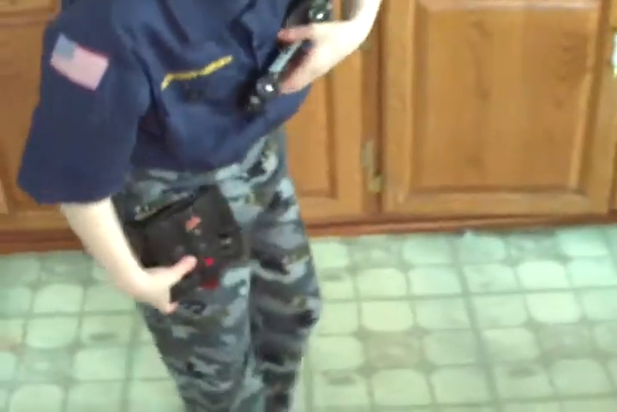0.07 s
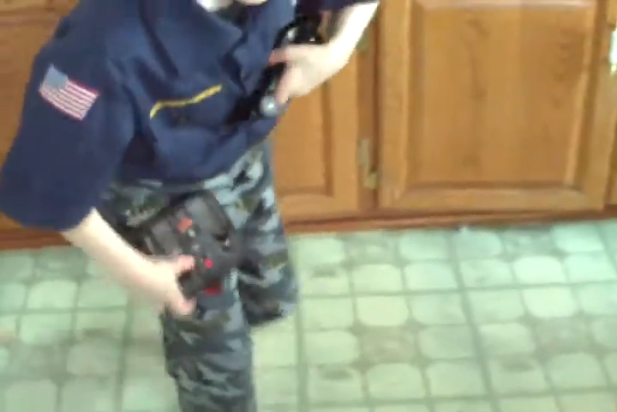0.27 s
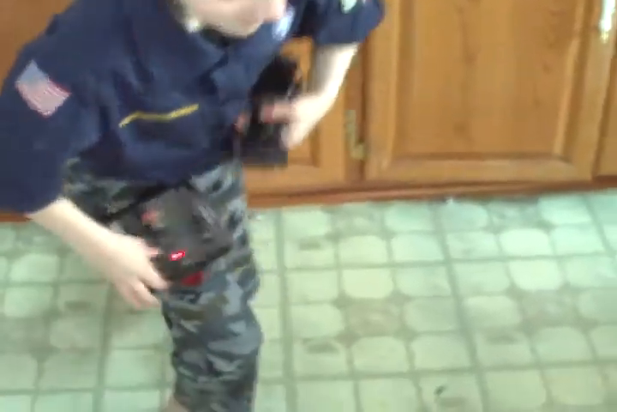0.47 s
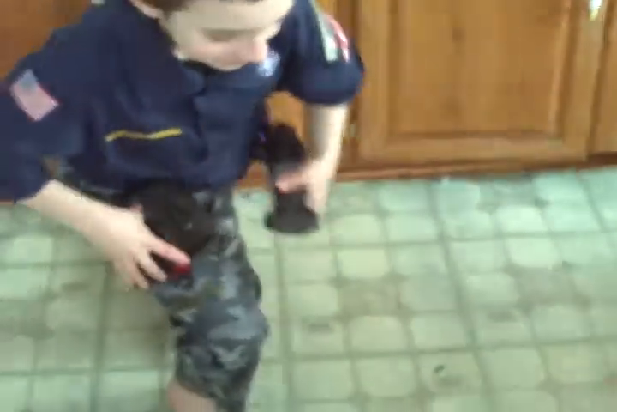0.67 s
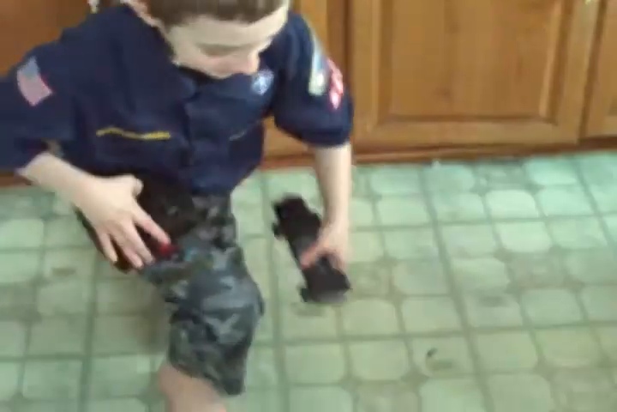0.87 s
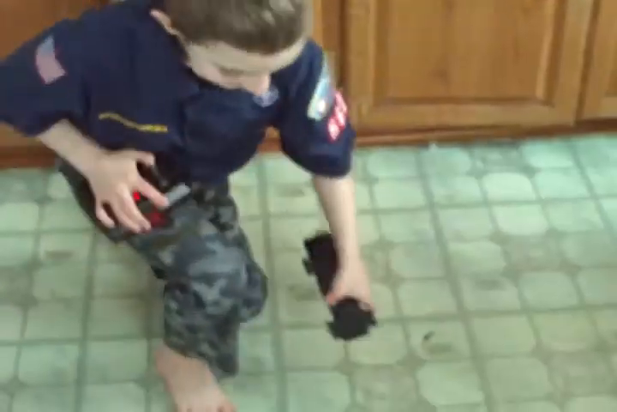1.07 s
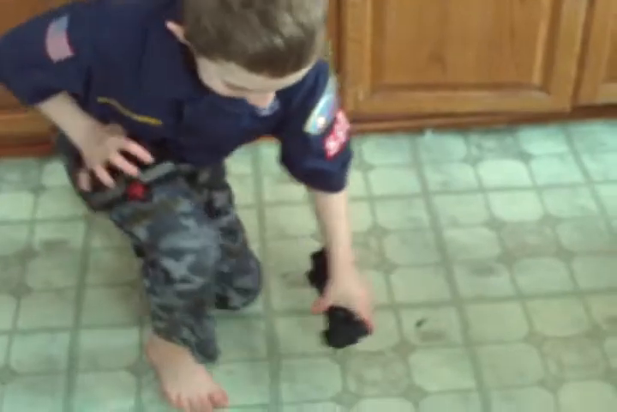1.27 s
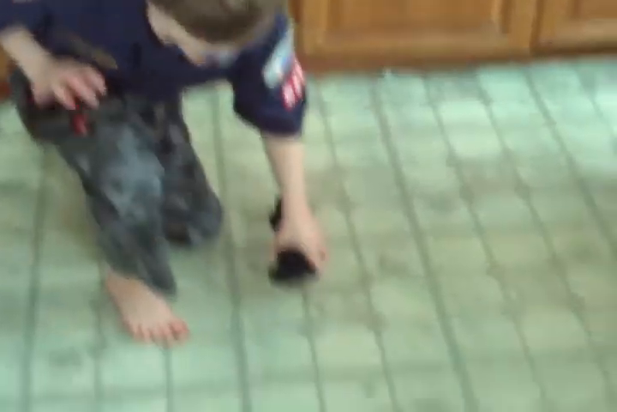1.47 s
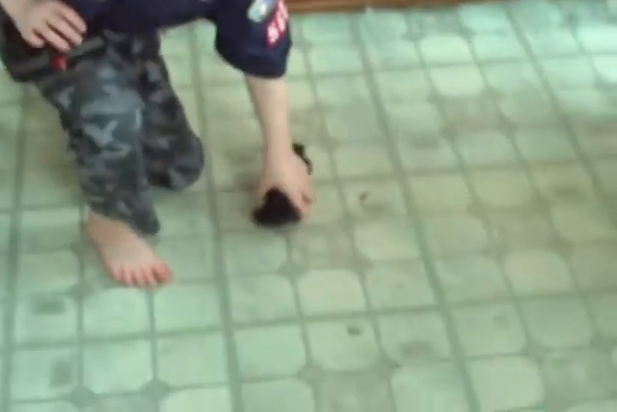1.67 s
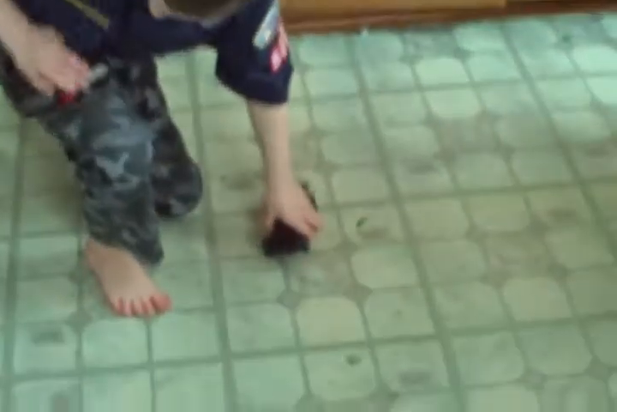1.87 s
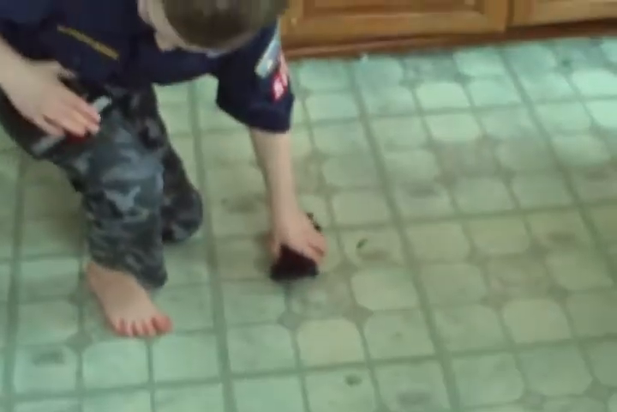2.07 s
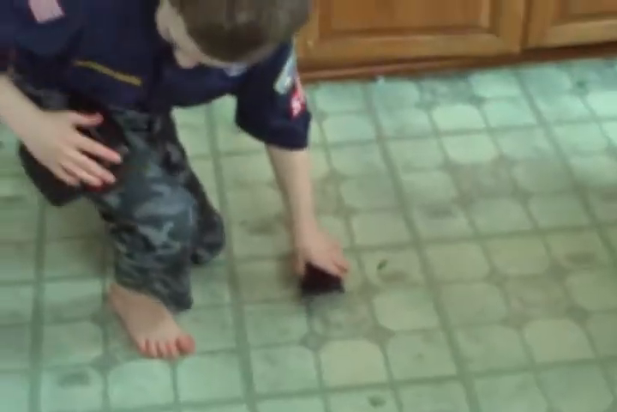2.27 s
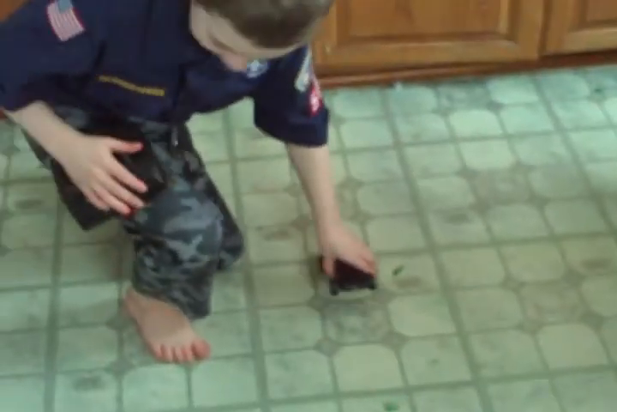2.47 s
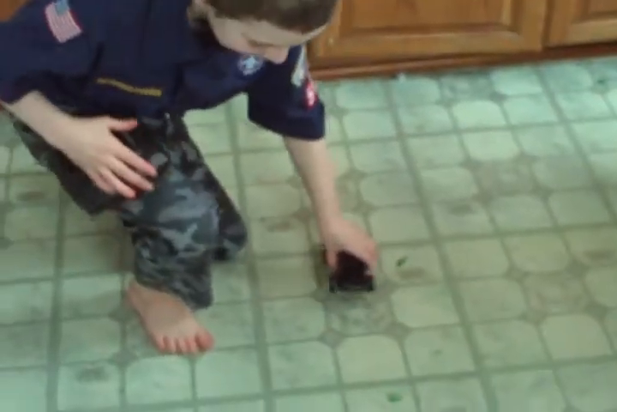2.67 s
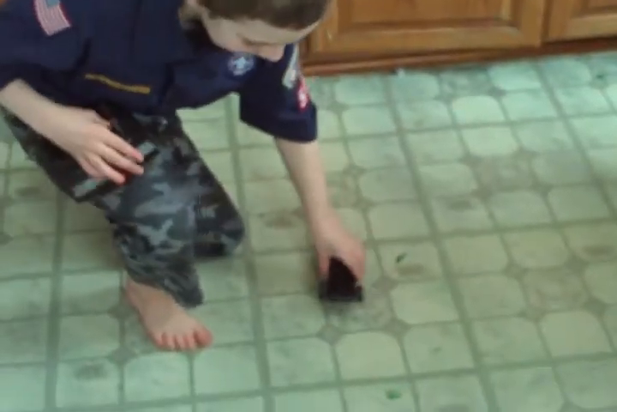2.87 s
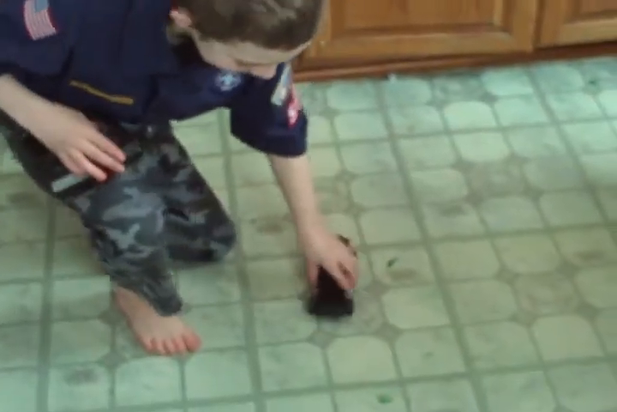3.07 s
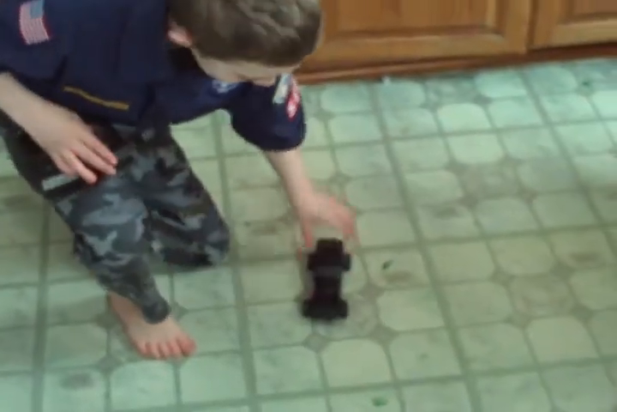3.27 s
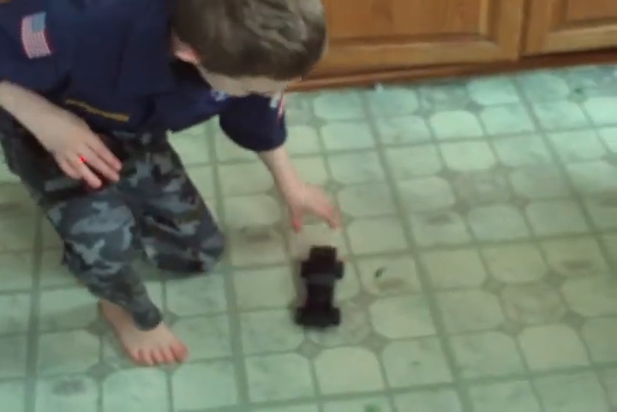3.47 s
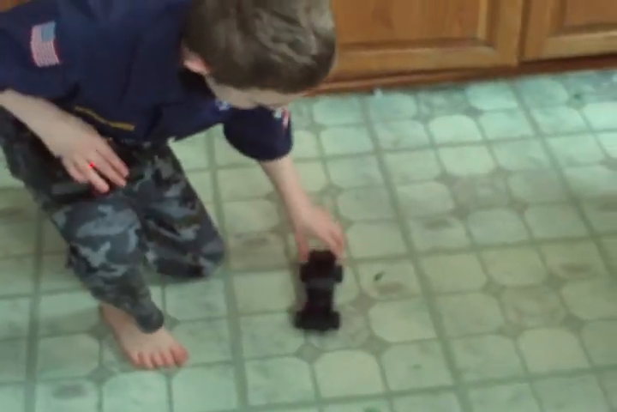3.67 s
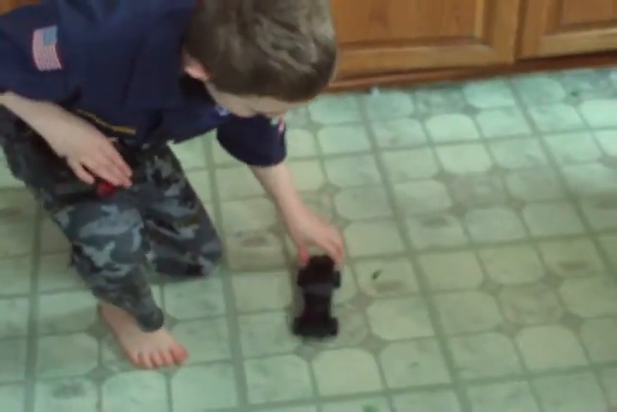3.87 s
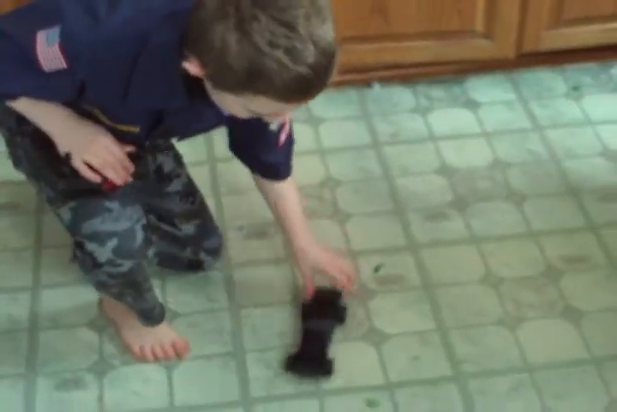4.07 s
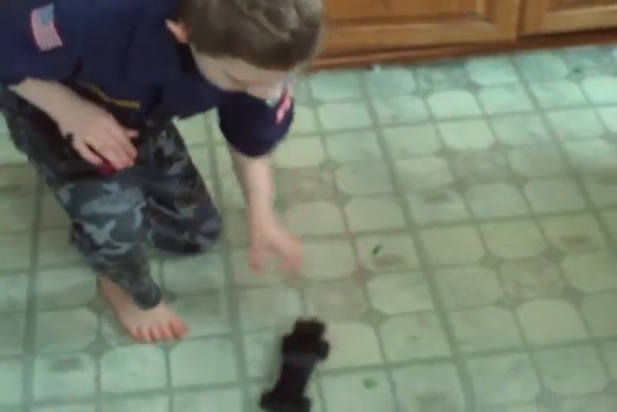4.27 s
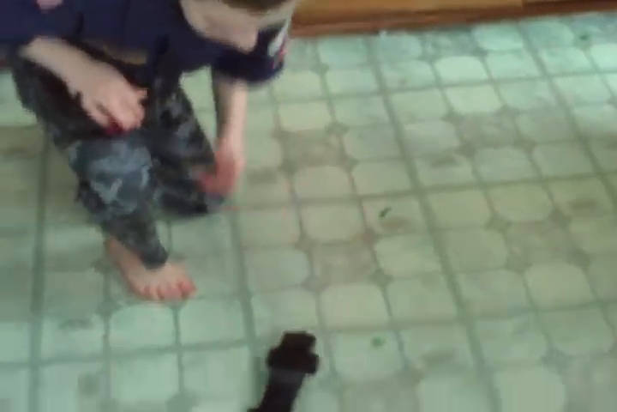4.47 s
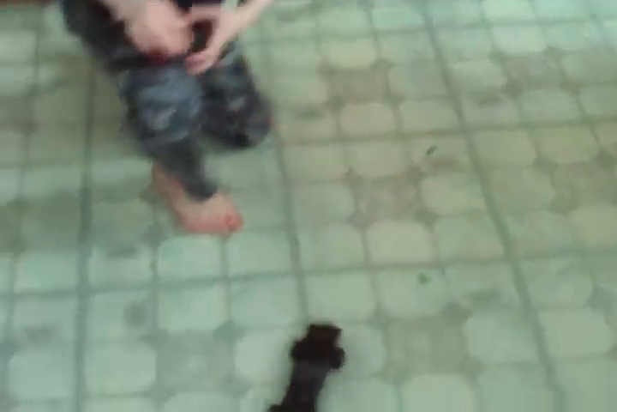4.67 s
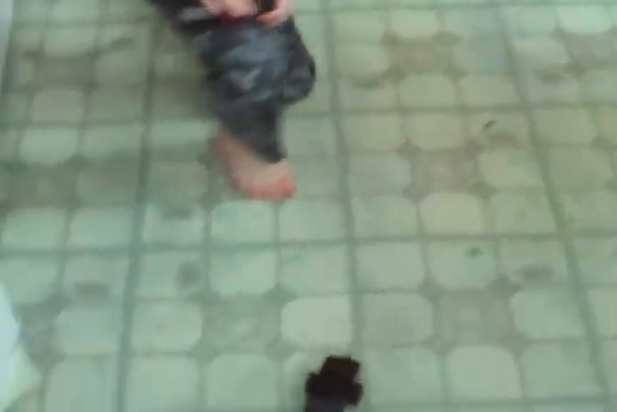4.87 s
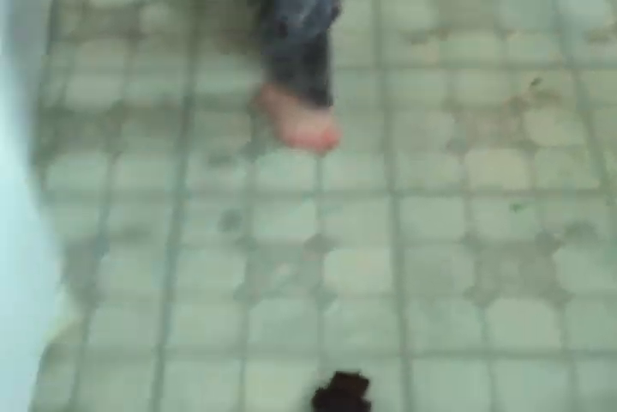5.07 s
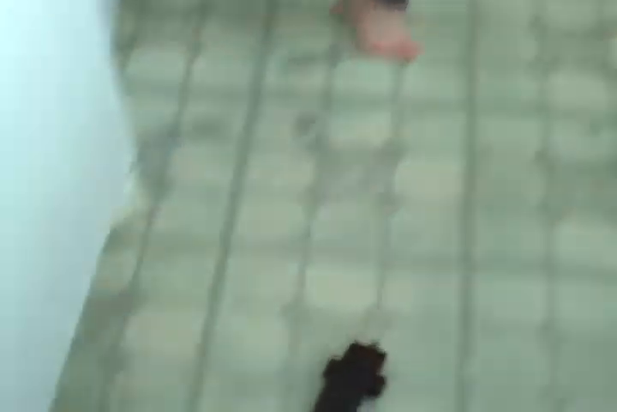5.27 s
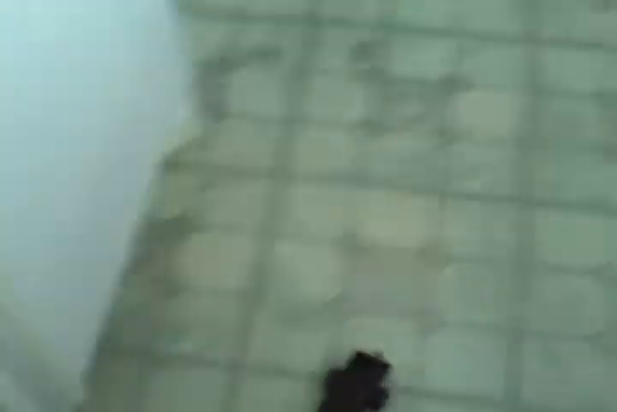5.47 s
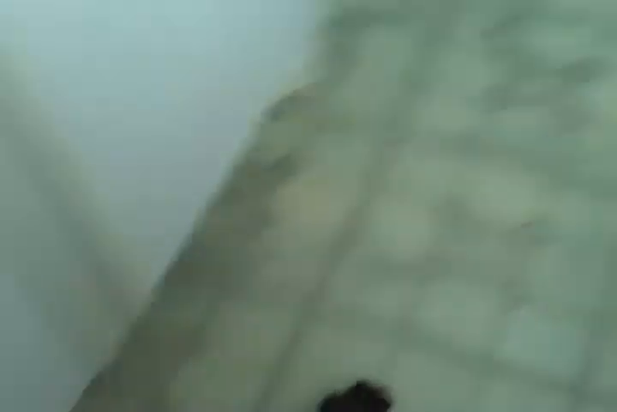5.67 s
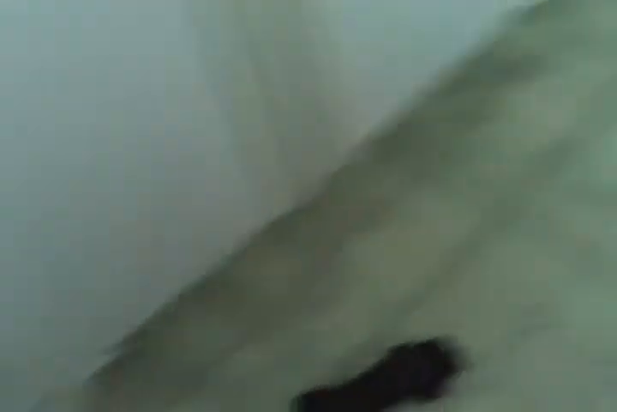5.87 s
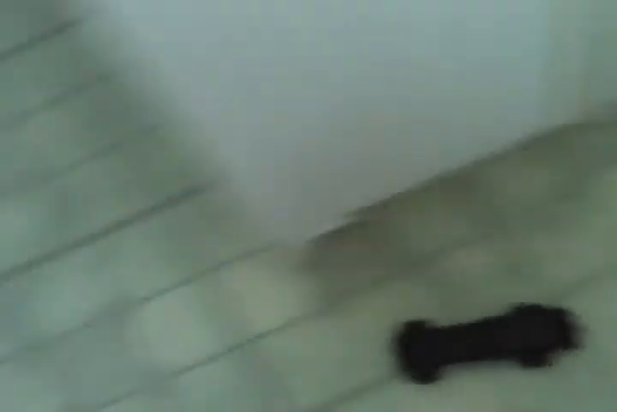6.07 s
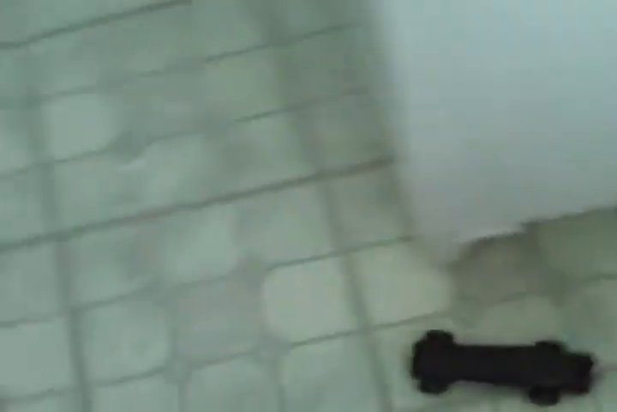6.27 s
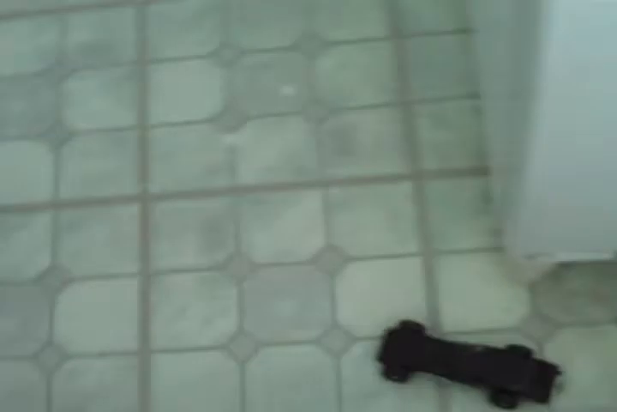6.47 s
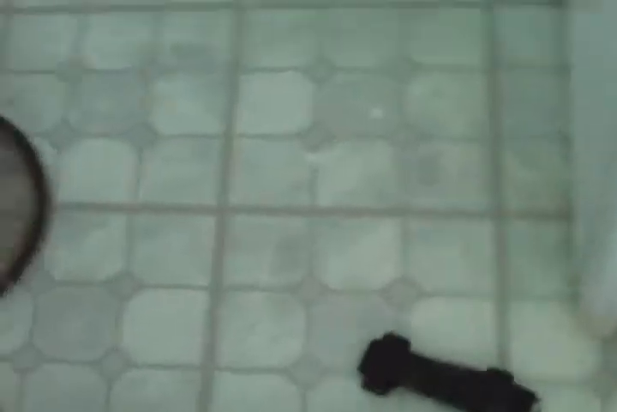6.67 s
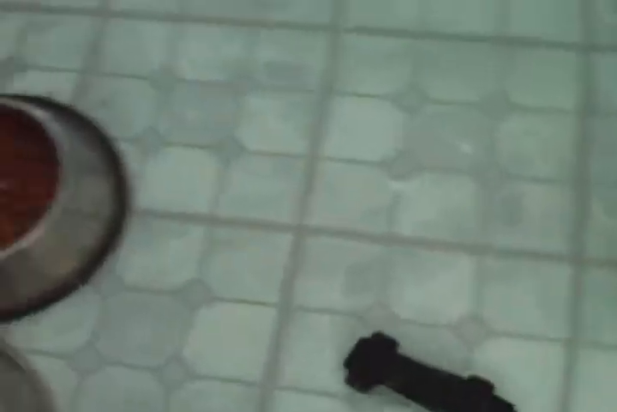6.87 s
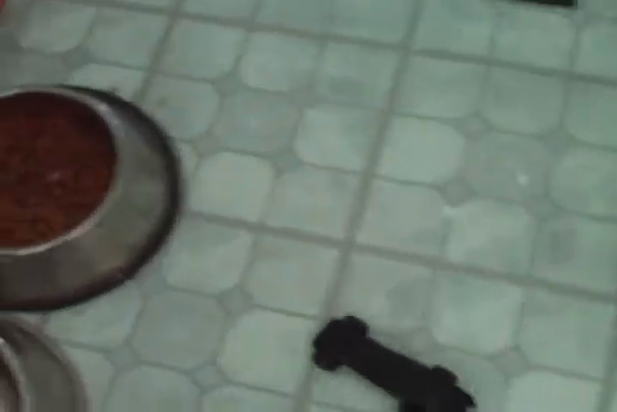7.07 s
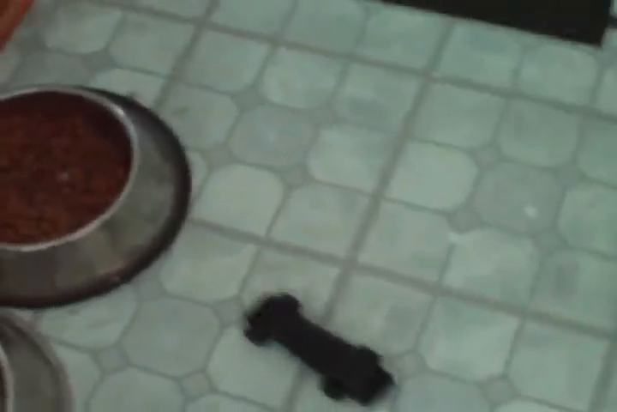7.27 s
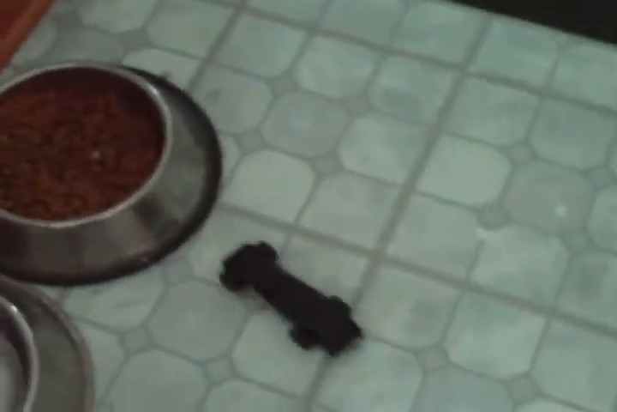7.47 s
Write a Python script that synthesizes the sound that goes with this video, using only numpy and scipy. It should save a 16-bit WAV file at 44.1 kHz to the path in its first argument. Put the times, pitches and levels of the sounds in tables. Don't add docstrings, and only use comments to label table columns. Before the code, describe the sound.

A small plastic toy car is knocked in the hand, set down with a bounce, then rattles off over kitchen tiles with a steady electric whine.

```python
import sys
import numpy as np
from scipy import signal
from scipy.fft import rfft, irfft, next_fast_len
from scipy.io import wavfile
from scipy.ndimage import uniform_filter1d, map_coordinates

SR = 44100
rng = np.random.default_rng(int(sys.argv[2]) if len(sys.argv) > 2 else 0)


def wrap_up_sound(samples):
    columns = np.atleast_2d(samples).T
    tamed = np.clip(columns, -1, 1)
    steps = np.round(tamed * 32767).astype(np.int16)
    wavfile.write(sys.argv[1], SR, steps)


def rack_gain(trim_db):
    fader = np.asarray(trim_db, float)
    return 10 ** (fader / 20)


N = 331829


def unit(x):
    return x / np.sqrt(np.mean(x ** 2) + 1e-20)


def along(points, hz):
    f, v = np.transpose(points)
    return np.interp(np.log(hz + 1), np.log(f + 1), v)


def curves(rows):
    s, *cols = np.transpose(rows)
    return [np.interp(np.arange(N) / SR, s, c) for c in cols]


def fade_in(start, length):
    return np.clip((np.arange(N) / SR - start) / length, 0, 1)


def bump(s, half):
    return np.exp(-((np.arange(N) / SR - s) / half) ** 2)


def wobble(rate):
    return map_coordinates(rng.standard_normal(int(N * rate / SR) + 4), [np.arange(N) * rate / SR])


def filtered(x, response):
    m = next_fast_len(len(x) + SR // 8)
    return irfft(rfft(x, m) * response(np.fft.rfftfreq(m, 1 / SR)), m)[:len(x)]


def modes(table):
    def response(f):
        total = 0
        for k, (center, width, db) in enumerate(table):
            damping = 1j * f * width
            total = total + (-1) ** k * rack_gain(db) * damping / (center * center - f * f + damping)
        return total
    return response


def patchy(patchy_db):
    z = signal.stft(rng.standard_normal(N), nperseg=512)[2]
    field = uniform_filter1d(rng.standard_normal(z.shape), 6, 0)
    field = uniform_filter1d(field, 10, 1)
    return signal.istft(z * rack_gain(patchy_db * unit(field)), nperseg=512)[1][:N]


def rush(spectrum, patchy_db):
    return unit(filtered(patchy(patchy_db), lambda hz: rack_gain(along(spectrum, hz))))


def drone(table, sharpness=1):
    return unit(filtered(rng.standard_normal(N), lambda f: modes(table)(f) ** sharpness))


def add(track, s, x):
    part = track[round(s * SR):][:len(x)]
    part += x[:len(part)]


# pitch in Hz, time to die by 60 dB in seconds.
RING_TIME = [(200, 0.29), (2000, 0.31), (6000, 0.28)]


def echo(x):
    hz, t, z = signal.stft(rng.standard_normal(SR // 2), SR, nperseg=256)
    decay = rack_gain(-60 * t / along(RING_TIME, hz)[:, None])
    tail = signal.istft(z * decay, SR, nperseg=256)[1]
    delayed = np.pad(x, (180, 0))
    return signal.fftconvolve(delayed, tail / np.linalg.norm(tail))[:len(x)]


def burst(life, table):
    t = np.arange(SR // 8) / SR
    scrape = rack_gain(-60 * t / life) * rng.standard_normal(len(t)) + 5 * (t == 0)
    ring = unit(filtered(scrape, lambda f: modes(table)(f) ** 3))
    return np.pad(2 * ring, (0, 3 * len(t)))


# pitch in Hz, level in dB per Hz.
ROOM_RUSH = [(12, -33), (20, -7.5), (32, -2), (59, -7.5), (81, -3), (120, 0), (207, 1.5), (240, -10),
             (306, -2.5), (465, -5.5), (761, -11.5), (1020, -11.5), (1630, -23.5), (4810, -31.5),
             (7130, -47.5), (9270, -89.5), (15700, -120)]
# pitch in Hz, width in Hz, level in dB.
HUM = [(59.9, 0.79, -37.5), (123.5, 15, -37.5), (238.1, 7.5, -37.5)]


def kitchen():
    air = rack_gain(-30.2 + .6 * wobble(4)) * rush(ROOM_RUSH, patchy_db=1.1)
    drones = sum(rack_gain(db) * drone([(hz, width, 0)]) for hz, width, db in HUM)
    passing = fade_in(5.9, 0.78) * (1 - fade_in(7.11, 0.17))
    panel = rack_gain(-28) * passing * drone([(238.3, 27, 0)], sharpness=2)
    return air + drones + panel


# start in seconds, peak in dB, shell pitch in Hz,
# shell width in Hz, dull body push in dB.
KNOCKS = [(0.126, -32.5, 1660, 800, -8.5), (0.673, -32.5, 2500, 2290, -29), (0.739, -32, 2450, 2300, -13.5),
          (.74, -22.5, 683, 301, -19), (1.047, -30, 3530, 2930, -18), (1.052, -23.5, 2300, 2540, -14),
          (1.054, -15.5, 720, 493, -20.5), (1.072, -18, 1180, 890, 3), (2.022, -23.5, 2300, 910, -21),
          (2.038, -27, 3070, 397, -6.5), (2.025, -23, 1500, 900, -23), (2.661, -20.5, 2420, 920, -6),
          (2.66, -36.5, 4220, 2200, -24), (2.662, -17, 1650, 496, -8), (2.684, -31.5, 1520, 600, 3)]
SETDOWN = [
    (3.06, -17, 2260, 2100, 5.5),
    (3.091, -7, 2345, 600, 0),
    (3.11, -15.5, 2290, 446, 5.5),
    (3.138, -22.5, 2330, 457, -7.5),
]


def knocks():
    out = np.zeros(N)
    # (last column, dB)
    contacts = [(*row, -30) for row in KNOCKS] + [(*row, -17) for row in SETDOWN]
    for s, db, hz, width, low_db, bright_db in contacts:
        shell = burst(.028, [(hz, 1.11 * width, 0)])
        low = rack_gain(low_db) * burst(0.097, [(135, 120, 6.7), (750, 2760, 0.99)])
        bright = rack_gain(bright_db) * burst(0.039, [(4860, 3500, 0.019)])
        dry = rack_gain(db - 26.5) * (shell + low + bright)
        add(out, s, dry + rack_gain(2.5) * echo(dry))
    return out


# start in seconds, peak in dB, floor pitch in Hz (negative: the floor
# first swings the other way, as when the heel lifts), time to die by 60 dB in seconds.
STEPS = [
    (0.997, -8, 68, 0.086),
    (1.0094, 1, -61.5, 0.12),
    (1.02, -7.5, 45, 0.66),
    (1.023, -3.5, 52, 0.12),
    (4.942, -22, 43, 0.22),
    (5.571, -18, 47.5, 0.56),
    (5.73, -15.5, 35, 0.29),
    (6.289, -18.5, 37, 0.22),
    (6.921, -19, 43, 0.58),
    (7.423, -18, 36.5, 0.44),
]


def steps():
    out, t = np.zeros(N), np.arange(SR // 2) / SR
    for s, db, hz, t60 in STEPS:
        soft_start = 1 - np.exp(-t / 0.0027)
        add(out, s, rack_gain(db - 60 * t / t60) * soft_start * np.sin(2 * np.pi * hz * t))
    return out


# time in seconds, pace in dB, wheel load on the floor in dB.
ROLL = [(3.94, -44.5, -33.5), (4.05, -32.5, -28.5), (4.19, -29.5, -28), (4.7, -33, -22), (4.92, -28.5, -27),
        (5.05, -30.5, -25.5), (5.35, -30, -23.5), (5.9, -24.5, -22.5), (6.14, -24, -18), (6.22, -30.5, -22),
        (6.55, -26.5, -20), (6.65, -30, -24), (6.9, -28, -23), (7.2, -33, -22.5), (7.52, -33.5, -21)]


def pace_and_load():
    return curves(ROLL)


def turned_away():
    return fade_in(5.6, 0.11)


# pitch in Hz, level in dB per Hz.
RUMBLE = [(76, -28), (130, -4), (157, 3), (189, -7), (241, -6.5), (264, -10), (355, -12), (420, -14.5),
          (550, -35.5), (920, -120)]
# pitch in Hz, level in dB per Hz.
SLAB = [(60, -41.5), (85, -8), (110, 6.5), (128, 3.5), (160, -45)]
# pitch in Hz, level in dB per Hz.
CHASSIS = [(250, -22), (400, -0.5), (700, 0), (1050, -1.5), (1300, -18.5), (1800, -30)]
# pitch in Hz, width in Hz, level in dB.
SHELL = [(1500, 270, 3), (1880, 540, 1.5), (2320, 545, 1), (2940, 1600, -26)]
# pitch in Hz, width in Hz, level in dB.
CAVITY = [(2300, 590, 0)]


def rolling():
    pace_db, load_db = pace_and_load()
    shake = wobble(22)

    chatter = (rng.random(N) < 700 / SR) * rng.standard_normal(N) * rack_gain(2.8 * shake)
    excite = unit(chatter + rack_gain(-1.0) * echo(chatter)) + 0.64 * patchy(2.9)
    shell = unit(filtered(excite, lambda f: modes(SHELL)(f) * modes([(2200, 2400, 0)])(f)))
    cavity = unit(filtered(excite, lambda f: modes(CAVITY)(f) ** 2))
    facing_db = -5.5 + 7.5 * bump(5.42, 0.27)
    rattle = shell + rack_gain(facing_db) * (1 - 0.75 * turned_away()) * cavity

    after_push = fade_in(4.95, .15)
    slab_db = -23.5 + 0.95 * (load_db + 21) + after_push * (-8.5 + 3 * wobble(18))
    chassis_db = -32.5 + 0.48 * (pace_db + 30.5) + 0.63 * (load_db + 23.5)

    car = rack_gain(load_db + 1.74 * wobble(20)) * rush(RUMBLE, patchy_db=-0.5)
    car += rack_gain(slab_db) * rush(SLAB, patchy_db=1.5)
    car += rack_gain(chassis_db + 1.3 * shake) * rush(CHASSIS, patchy_db=-0.5)
    car += rack_gain(pace_db - 2.06 + 0.59 * wobble(12)) * rattle
    return fade_in(3.94, 0.048) * car


# time in seconds, multiple of the shaft rate,
# swell or dip in dB, half length in seconds.
WAVES = [(4.332, 2, -6, 0.064), (4.662, 2, -5.5, .04), (4.884, 2, 5.5, 0.14), (5.08, 2, -3.5, 0.056),
         (5.46, 2, -3.5, 0.095), (5.664, 2, 1.5, 0.042), (5.853, 2, -18, 0.083), (6.045, 2, -4.5, 0.042),
         (6.222, 2, -3, .03), (6.4, 2, 5, 0.12), (6.837, 2, 3.5, 0.12), (7.111, 2, -14.5, 0.078),
         (7.28, 2, -3.5, 0.072), (7.513, 2, 3.5, 0.065), (4.565, 4, 5.5, .06), (5.088, 4, 5, 0.05),
         (5.418, 4, 3.5, 0.23), (5.847, 4, -15, 0.054), (5.96, 4, 12, 0.044), (6.31, 4, 9.5, .05),
         (6.655, 4, 8, 0.2), (6.95, 4, 8, 0.12), (4.33, 8, -19, 0.07), (4.565, 8, 2, 0.2),
         (4.911, 8, 8.5, 0.037), (5.353, 8, 3, 0.1), (5.98, 8, 0.5, 0.043), (6.458, 8, 4, 0.05),
         (6.87, 8, 7, 0.084), (7.033, 8, 5.5, 0.027)]


def standing_waves(multiple):
    return sum(db * bump(s, half) for s, k, db, half in WAVES if round(k) == multiple)


# time in seconds, turns a second (Hz).
SPEED = [(4.29, 490), (4.33, 515), (4.36, 551), (4.4, 565), (4.6, 567.2), (5.0, 566.3), (6.2, 566.6),
         (6.55, 569), (7.05, 569), (7.25, 567.5), (7.52, 567)]
# multiple of the shaft rate, level in dB, flicker in dB.
OVERTONES = [(2, -26.5, 0), (4, -39, 3), (8, -46, 2)]
# multiple of the shaft rate, level in dB.
WEAK_ORDERS = [(1, -38), (6, -48.5), (9, -64.5), (10, -51), (11, -58), (12, -58)]
# pitch in Hz, level in dB per Hz.
AIRFLOW = [(2500, -8), (3300, -7), (4400, -6.5), (5000, -10.5), (5600, -9), (6200, -30.5), (7000, -21.5),
           (7400, -56)]


def propeller():
    turns = np.cumsum(curves(SPEED)[0] * (1 + .0011 * wobble(25))) / SR
    pace_db, _ = pace_and_load()

    levels = []
    for k, db, flicker_db in OVERTONES:
        k = round(k)
        levels.append((k, db + standing_waves(k) + flicker_db * wobble(16)))
    blade_db = levels[0][1]
    for k, db in WEAK_ORDERS:
        level = db + .4 * (blade_db + 27) + 3 * wobble(14) + 12 * (fade_in(4.3, .15) - 1)
        if k == 1:
            level = level - 6 * (1 - turned_away())
        levels.append((k, level))

    whine = np.zeros(N)
    for k, db in levels:
        jitter = .25 * wobble(40)
        if k == 4:
            jitter = jitter + .8 * wobble(110)
        whine += rack_gain(db + 0.95 * wobble(25)) * np.sin(2 * np.pi * k * turns + jitter)
    whine *= np.sqrt(2) * fade_in(4.31, 0.032)

    air_db = -39 + 0.97 * (pace_db + 31) + 4.5 * bump(4.3, 0.051)
    air = rack_gain(air_db + 1.4 * wobble(22)) * rush(AIRFLOW, patchy_db=1.0)
    return whine + fade_in(4.0, 0.28) * air


# start in seconds, peak in dB, shell pitch in Hz.
JOINTS = [(4.0372, -22, 2280), (4.0991, -31, 2180), (4.1415, -18, 1970), (4.165, -16, 1350),
          (4.2994, -19, 2170), (4.4518, -22.5, 2330), (4.7731, -17, 2070), (5.1417, -15.5, 2250),
          (5.28, -13.5, 2320), (5.3378, -10.5, 2320), (5.4565, -11, 2420), (5.4954, -10.5, 2220),
          (5.8122, -11.5, 1774), (5.9194, -11, 1540), (5.964, -13.5, 1780), (6.1429, -10.5, 1770),
          (6.2287, -13, 1780), (6.3026, -14, 2140), (6.5554, -13, 2150), (7.016, -14, 2130),
          (7.1766, -22, 2130), (7.2095, -15.5, 2170), (7.2315, -12.5, 2130), (7.3547, -17, 2280),
          (7.4729, -16, 1720), (7.5009, -10.5, 2050)]


def joints():
    out = np.zeros(N)
    for s, db, hz in JOINTS:
        shell = burst(0.035, [(hz, 1400, 0)])
        bright = rack_gain(-13.5) * burst(0.028, [(4430, 3600, 0)])
        low = rack_gain(-5.5) * burst(0.041, [(600, 1300, 0)])
        dry = rack_gain(db - 29.5) * (shell + bright + low)
        add(out, s, dry + echo(dry))
    return out


def scene():
    return (kitchen() + knocks() + steps() + rolling() + propeller() + joints())[None]


# pitch in Hz, level in dB against its neighbourhood.
WEAKEST_KEPT = [(2500, -28.5), (3300, -12), (4700, 0), (5700, -1.5), (6900, 1.5)]


def lose_faint_detail(x):
    hz, _, z = signal.stft(x, SR, nperseg=1536)
    power = uniform_filter1d(np.abs(z) ** 2, size=2, axis=0)
    around = uniform_filter1d(power, size=45, axis=0)
    limit_db = 4 * unit(uniform_filter1d(rng.standard_normal(z.shape), size=7, axis=0))
    limit_db += 0.13 * (10 * np.log10(power[hz > 1200].sum(axis=0) + 1e-12) + 36)
    kept = power > around * rack_gain(2 * (along(WEAKEST_KEPT, hz)[:, None] + limit_db))
    return signal.istft(z * kept, SR, nperseg=1536)[1][:N]


# pitch in Hz, gain in dB.
MIC = [(20, 0.5), (5500, 1), (6500, -2.5), (7300, -6), (7500, -70)]


def microphone(x):
    return filtered(x, lambda hz: rack_gain(along(MIC, hz)))


def top_cut(x):
    return signal.sosfilt(signal.butter(12, 7280, fs=SR, output="sos"), x)


def record(dry):
    x = lose_faint_detail(microphone(dry[0]))
    x = x / (1 + np.abs(x / .95) ** 8) ** (1 / 8)
    return top_cut(x[None])


dry = scene()
out = record(dry)
wrap_up_sound(out)
```